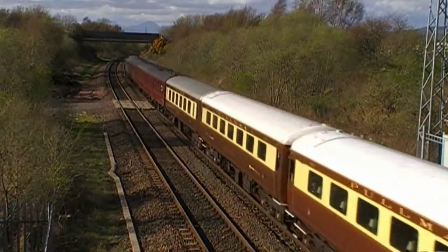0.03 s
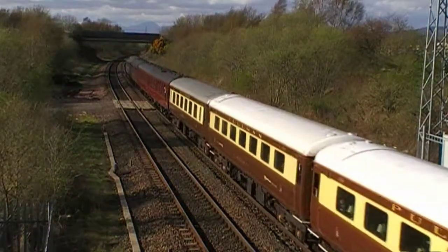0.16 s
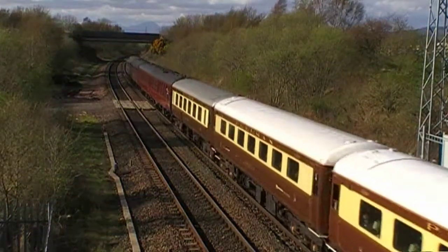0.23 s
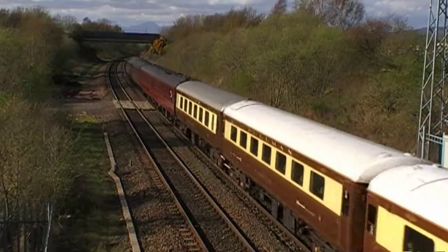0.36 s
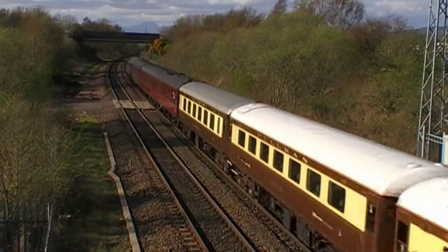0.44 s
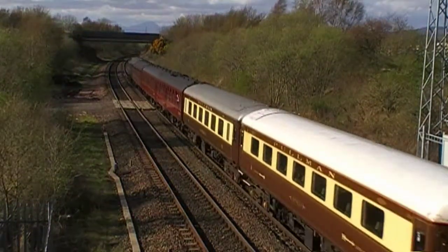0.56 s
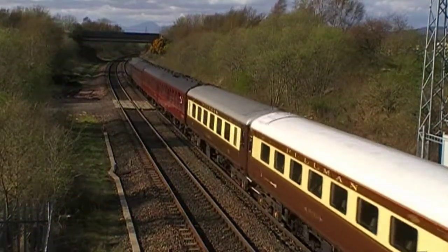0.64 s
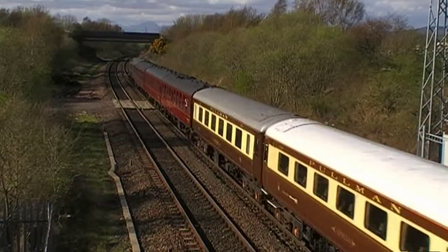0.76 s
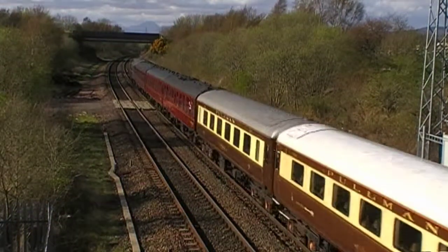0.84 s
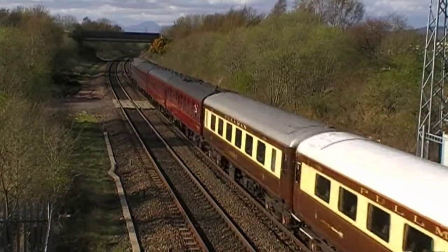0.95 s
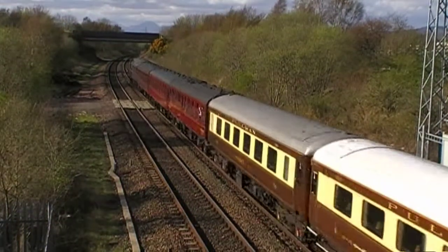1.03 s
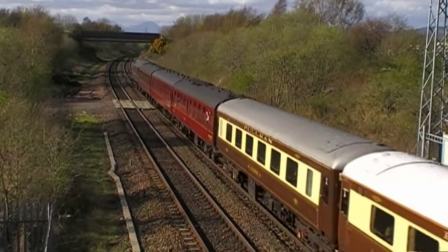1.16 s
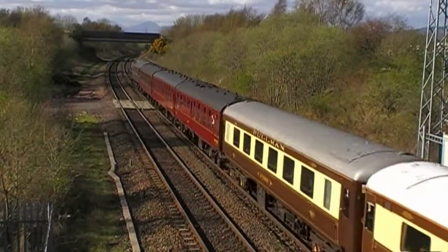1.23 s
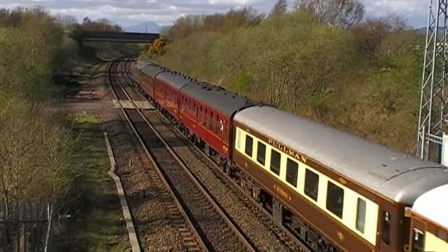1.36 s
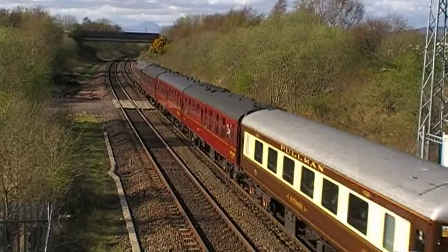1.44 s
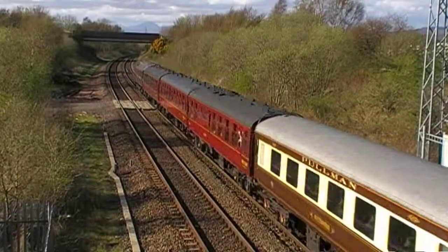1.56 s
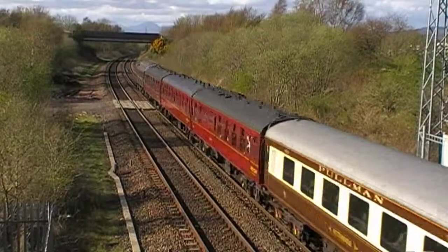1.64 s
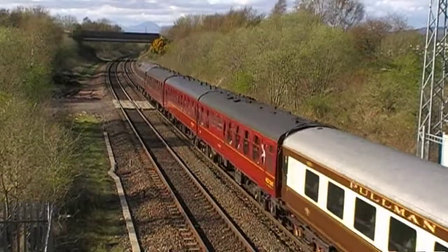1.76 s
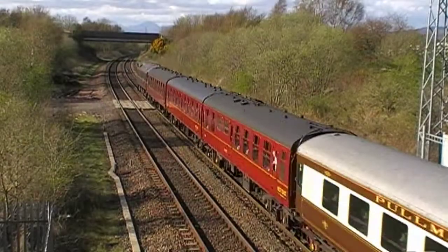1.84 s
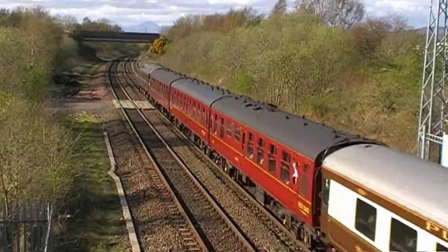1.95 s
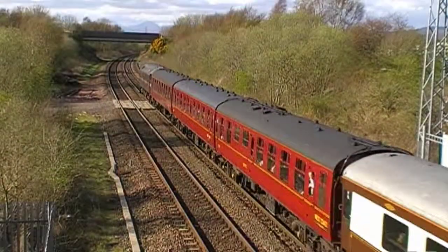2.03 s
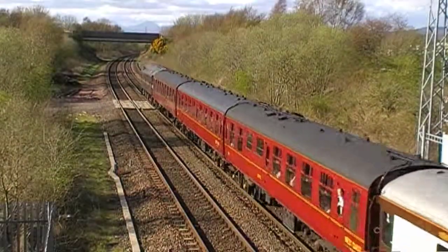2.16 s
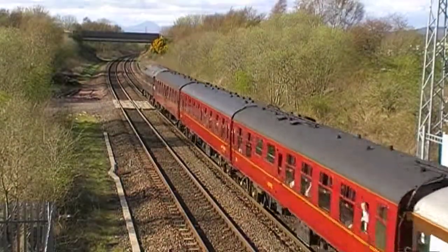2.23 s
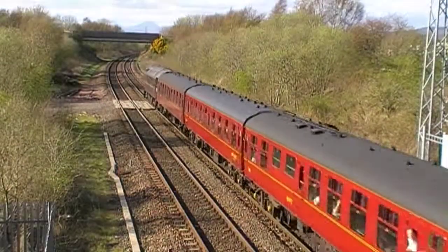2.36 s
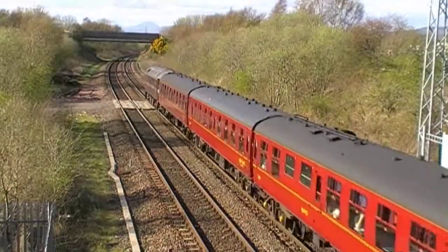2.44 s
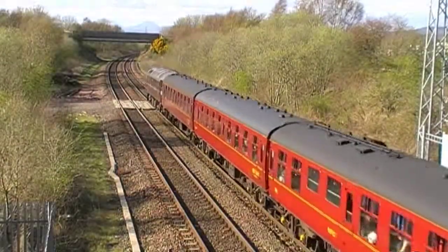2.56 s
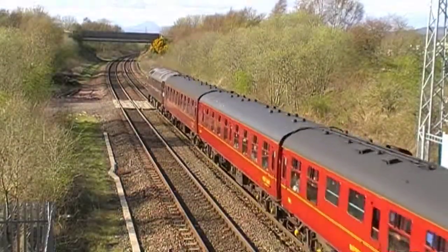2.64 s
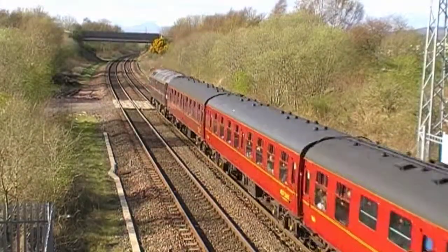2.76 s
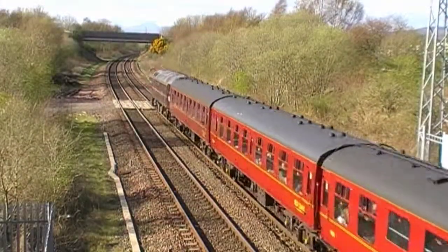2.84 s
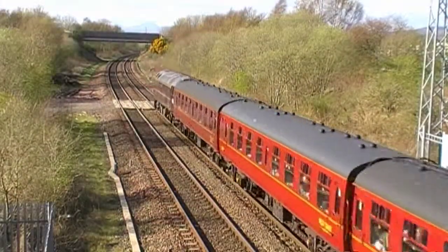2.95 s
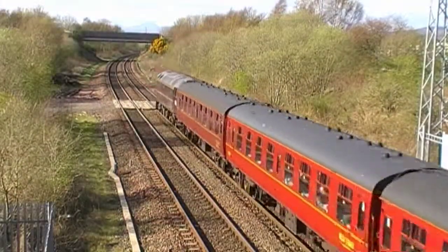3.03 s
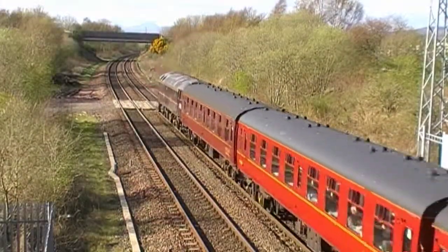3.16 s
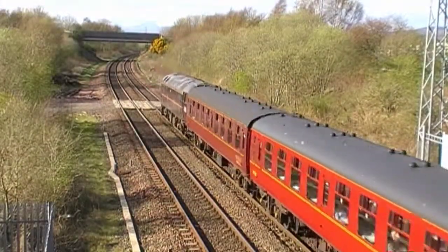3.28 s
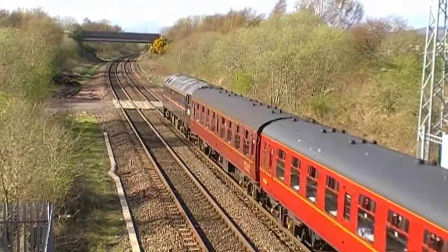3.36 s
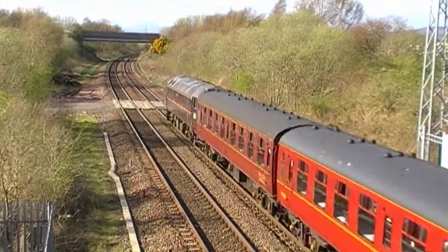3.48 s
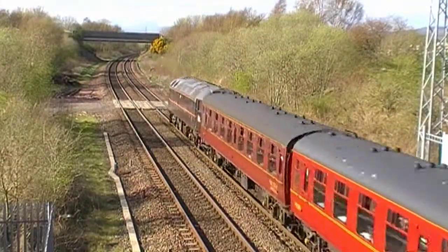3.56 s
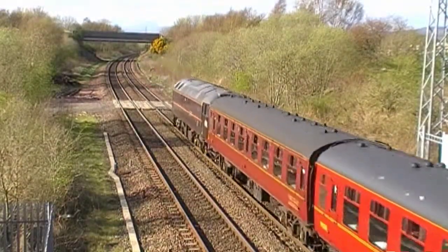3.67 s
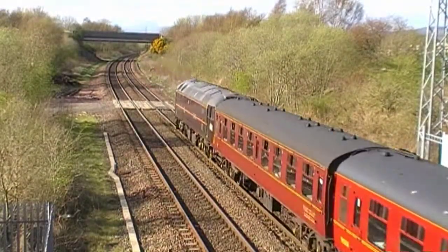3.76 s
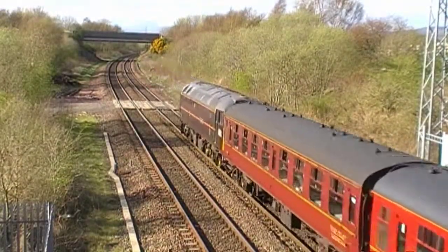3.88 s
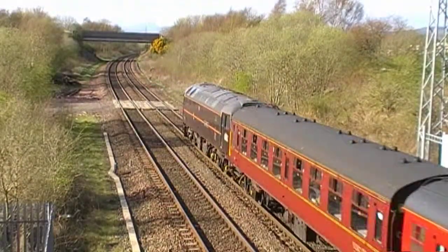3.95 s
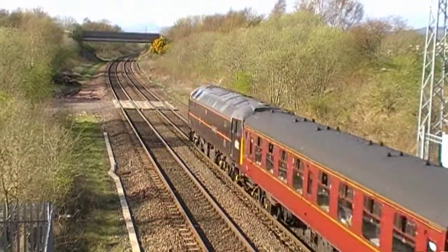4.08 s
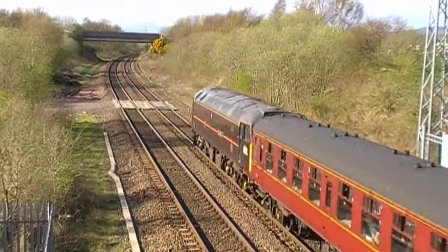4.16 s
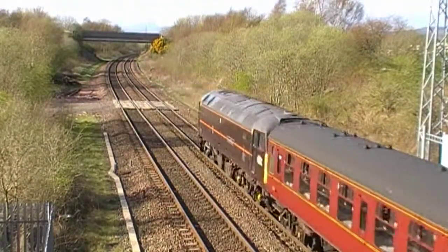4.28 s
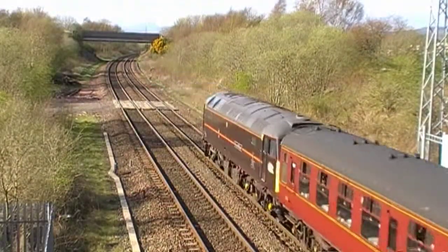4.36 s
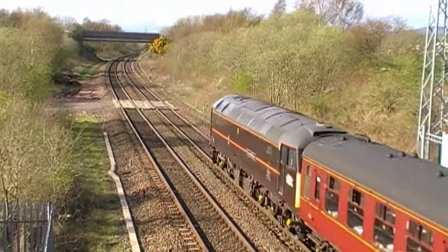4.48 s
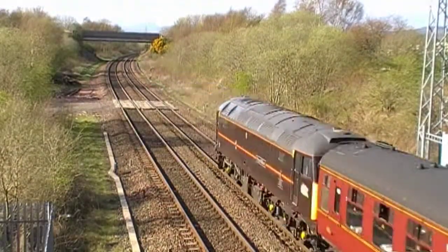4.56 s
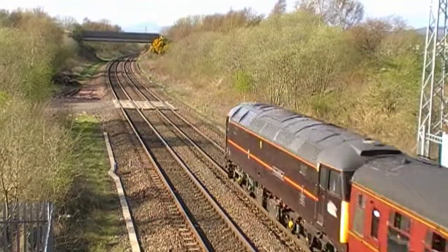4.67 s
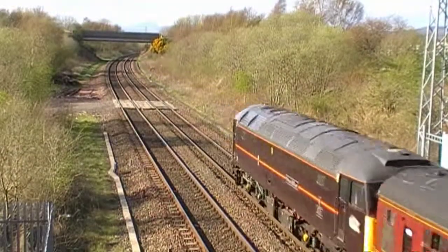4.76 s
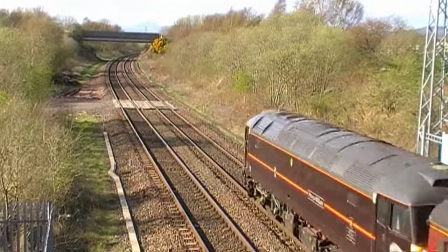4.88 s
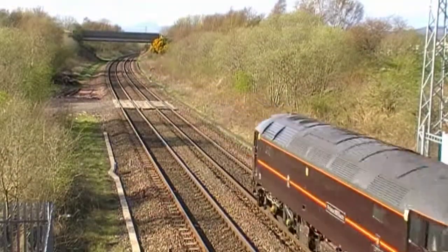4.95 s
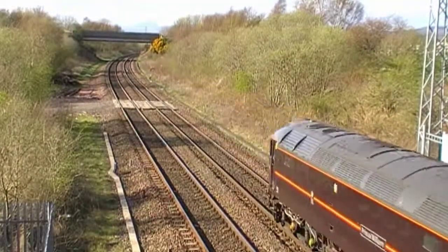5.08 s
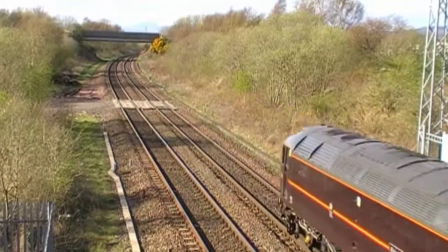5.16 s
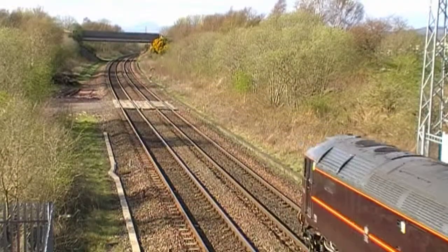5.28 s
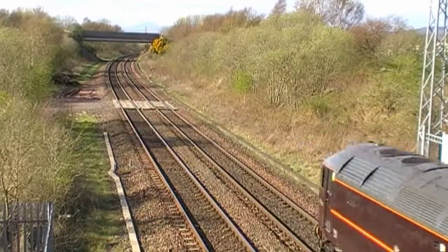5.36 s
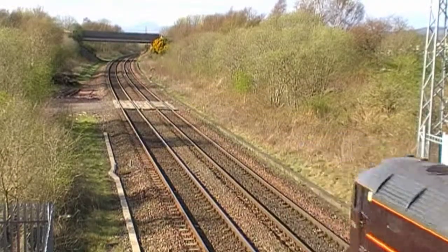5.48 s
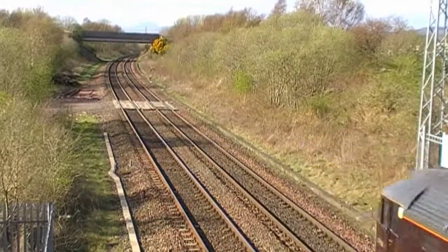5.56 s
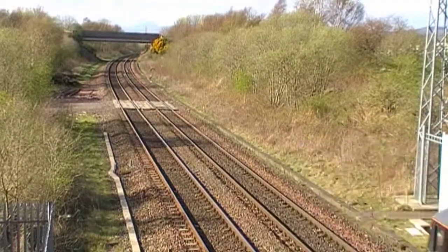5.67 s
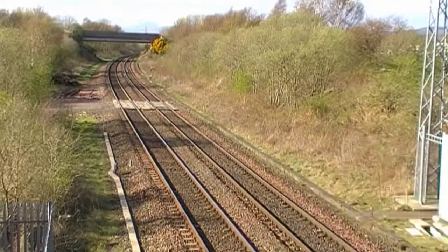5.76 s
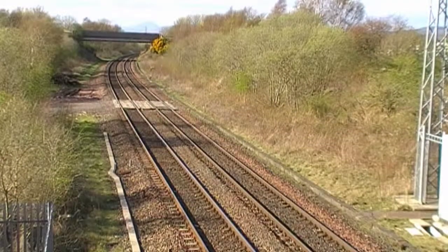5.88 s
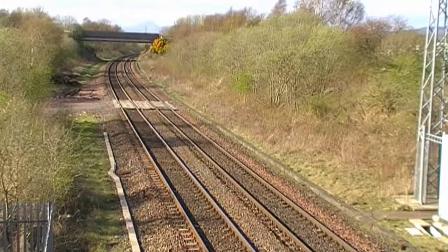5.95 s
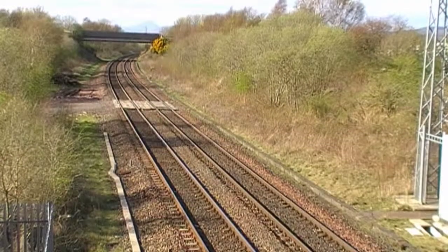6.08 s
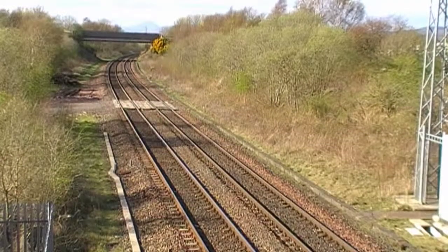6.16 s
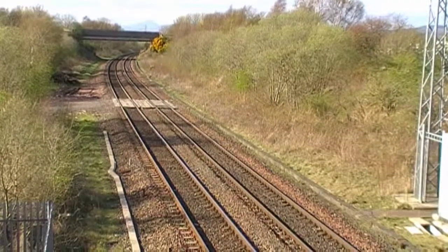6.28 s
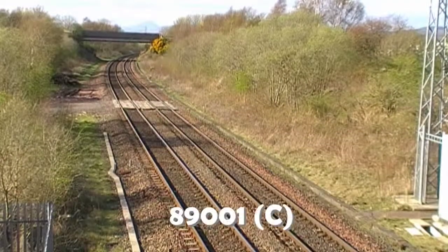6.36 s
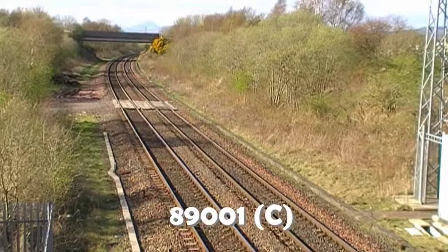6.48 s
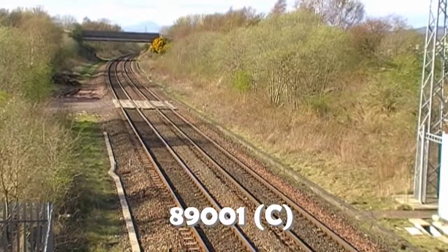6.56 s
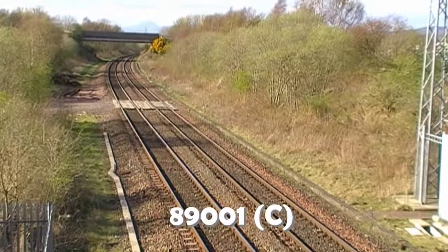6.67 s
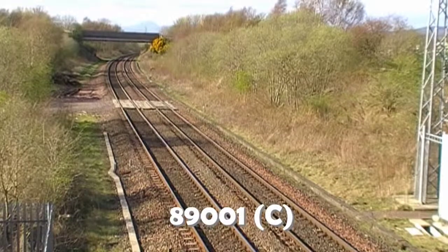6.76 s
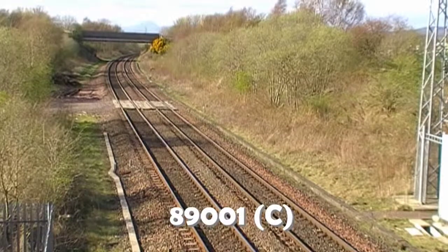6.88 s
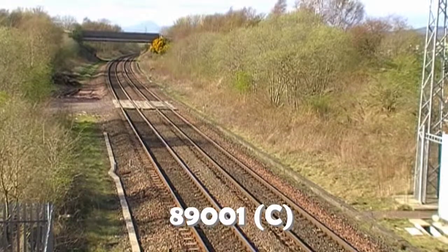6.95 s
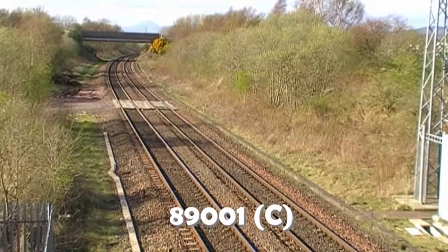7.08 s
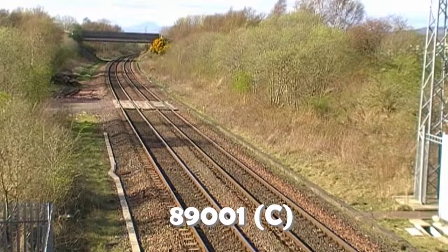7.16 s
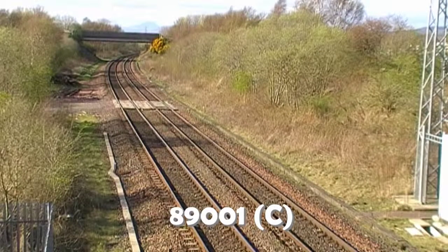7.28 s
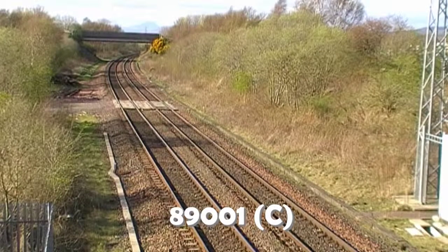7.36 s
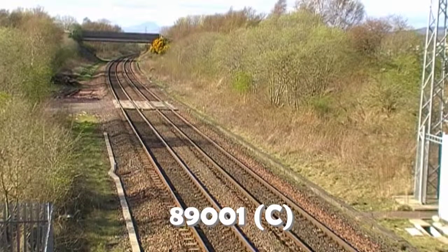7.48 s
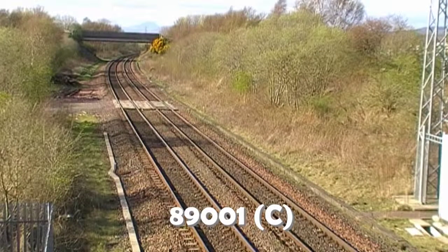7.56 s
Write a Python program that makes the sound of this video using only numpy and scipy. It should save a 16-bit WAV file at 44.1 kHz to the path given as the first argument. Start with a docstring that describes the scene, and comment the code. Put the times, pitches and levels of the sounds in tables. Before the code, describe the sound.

Outdoor stereo microphone near a railway line, already in the middle of a train pass. From 0 to 2.3 s coaches roar by, each bogie swelling and fading, with steel hiss, quick double clacks, small rattles and a blurred singing wheel tone around 1.5 to 2 s. Very short high chirps appear near 0.7 s. Wind thumps break in at 0.3 and 1.1 s. From 2.3 to 3.1 s heavy dull thuds with falling swoops boom, strongest near 2.9 s. Rolling and clatter continue, with wind bumps around 4.2 and 4.8 to 5.2 s. A hard clack lands at 5.2 s, then the rear diesel's rough low growl runs from about 5.4 to 6.3 s. After 6 s the train drops away to a distant rumble, while dense, violent wind gusts buffet the microphone until 7.6 s, the loudest distorting and briefly ducking everything.

```python
"""Passenger train running away under a footbridge

Two kinds of coach pass bogie by bogie, then a diesel locomotive at the rear, fading down the cutting.
Shaped noise makes the roar, rumble and hiss; rough tones make the singing wheels and the growl.
Short bursts make clatter, chirps and thuds. Wind eddies push the two microphone channels apart,
and the strongest make a limiter duck everything."""
import sys
import numpy as np
from scipy import signal
from scipy.fft import rfft, irfft, next_fast_len
from scipy.io import wavfile
from scipy.ndimage import uniform_filter1d, minimum_filter1d

SR = 44100
rng = np.random.default_rng(int(sys.argv[2]) if len(sys.argv) > 2 else 0)


def file_out(sig):
    """Save sig as 16-bit WAV at sys.argv[1]."""
    # one column per channel
    cols = np.atleast_2d(sig).T
    # limit, then scale
    lim = np.clip(cols, -1, 1)
    pcm = np.round(lim * 32767).astype(np.int16)
    wavfile.write(sys.argv[1], SR, pcm)


N = 335689
T = np.arange(N) / SR


def amp(db):
    """Turns decibels into a linear gain."""
    return 10 ** (np.asarray(db) / 20)


def evened(x):
    """Scales a signal to rms 1."""
    return x / np.sqrt(np.mean(x ** 2) + 1e-20)


def read(points, hz):
    """Reads a spectrum joined by straight lines on a log-frequency axis."""
    point_hz, value = np.transpose(points)
    return np.interp(np.log(hz + 1), np.log(point_hz + 1), value)


def follow(points):
    """Draws a level curve in dB through (start_s, level_db) points."""
    return np.interp(T, *np.transpose(points))


def add(mix, start_s, sound):
    """Lays a sound into the mix; a start before zero moves to zero and the end is cut off."""
    part = mix[:, max(round(start_s * SR), 0):][:, :sound.shape[-1]]
    part += sound[..., :part.shape[1]]


def tinted(x, spectrum):
    """Filters x by a spectrum in dB."""
    size = x.shape[-1]
    hz = np.fft.rfftfreq(size, 1 / SR)
    return irfft(rfft(x) * amp(read(spectrum, hz)), size)


def coloured(spectrum, size):
    """Makes two unrelated noises of rms 1 with the given spectrum."""
    return evened(tinted(rng.standard_normal((2, size)), spectrum))


def centred(size):
    """Time in s with zero in the middle."""
    return (np.arange(size) - size / 2) / SR


def grid(size):
    """Frame times (a column) and bin frequencies of a short-time spectrum."""
    hop = size // 4
    frame_s = np.arange(N // hop + 5)[:, None] * hop / SR
    return frame_s, np.fft.rfftfreq(size, 1 / SR)


def wander(t, slow_hz, fast_hz, count=20):
    """Sums sines of random phase, the slow ones strongest, into an irregular drift of rms 1."""
    rates_hz = np.geomspace(slow_hz, fast_hz, count)
    return evened(sum(np.sin(2 * np.pi * (f * t + rng.random())) / np.sqrt(f) for f in rates_hz))


def patches(shape, size, order):
    """Random blotches of rms 1, size frames long and order bins wide."""
    blurred_in_time = uniform_filter1d(rng.standard_normal(shape), size, axis=0)
    return evened(uniform_filter1d(blurred_in_time, order, axis=1))


def noise(field_db):
    """Two unrelated noises of rms 1 whose colour follows a frames x bins field in dB."""
    gain = amp(field_db)
    gain = gain / np.sqrt(np.mean(gain ** 2, axis=1, keepdims=True))  # colour only, no level changes
    real, imaginary = rng.standard_normal((2, 2) + gain.shape)
    size = 2 * (gain.shape[1] - 1)
    sound = signal.istft((real + 1j * imaginary) * gain, nperseg=size, noverlap=size - size // 4,
                         time_axis=1, freq_axis=2)[1]
    return evened(sound[:, :N])


def rough_tone(curve, waver, waver_hz, flutter_db):
    """An unbroken tone on a curve of pitch and level, unsteady in both and silent outside the curve."""
    s, hz, db = np.transpose(curve)
    # each channel wavers on its own; the flutter is common
    wavers = np.array([wander(T, waver_hz, 6 * waver_hz, count=14) for _ in range(2)])
    pitch_hz = np.interp(T, s, hz, right=hz[-1]) * (1 + waver * wavers)
    level_db = np.interp(T, s, db, left=-200, right=-200) + flutter_db * wander(T, 8, 60, count=14)
    return np.sqrt(2) * amp(level_db) * np.sin(2 * np.pi * np.cumsum(pitch_hz, axis=1) / SR)


# colour of the wind: pitch_hz, level_db
WIND_COLOUR = [(15, -22), (40, -5.5), (75, -8.5), (110, 0), (200, -4.5), (290, -9.5), (450, -16.5),
               (900, -27), (2000, -46.5), (4000, -66), (10000, -76)]
# filter on the part of the wind that both channels share: pitch_hz, level_db
SHARED_WIND = [(20, -23), (60, -13.5), (120, -16.5), (250, -12), (600, -6.5), (3000, -3)]
# steady breeze between the eddies: start_s, level_db
BREEZE_LEVEL = [(0, -18), (.9, -19), (1.9, -28.5), (2.7, -32), (3.4, -28.5), (3.7, -19.5), (4.9, -20),
                (5.35, -28), (5.9, -20.5), (6.5, -26), (7.1, -23), (7.61, -35)]
# strong eddies: centre_s, peak_db of the opposed part, length_s, shared_lift_db before the shared filter
STRONG_EDDIES = [(0.256, 0, 0.022, -2), (0.792, -9.5, 0.019, 4.5), (1.121, -3.5, 0.034, -6),
                 (1.169, 1.5, 0.013, -7), (1.487, -3.5, 0.021, 0.5), (2.046, -1.5, 0.009, -3),
                 (4.16, -3, 0.02, -2), (4.791, -7, 0.041, 2), (4.944, -6, 0.019, 3), (5.17, -5, 0.069, 7),
                 (6.075, -3.5, 0.019, -6.5), (6.326, 0, 0.03, -3), (6.425, -8.5, 0.017, 3),
                 (6.548, -1.5, 0.015, 0.5), (6.61, 0, 0.028, 2.5), (6.658, 2.5, 0.039, 0.5),
                 (6.769, 3, 0.031, 0), (6.822, -6.5, 0.019, 7), (6.914, -18, 0.017, 5),
                 (7.01, -3, 0.034, 1), (7.094, -5.5, 0.022, 2), (7.168, 0, 0.03, -1.5),
                 (7.248, -2, 0.036, 2), (7.291, -12, 0.015, 3), (7.365, -3, 0.021, 1),
                 (7.425, 1, 0.03, -0.5), (7.573, -10.5, 0.017, 3)]
# small eddies at random: middle and spread of the peak level, the middle taken over the breeze
EDDY_DB, EDDY_SPREAD_DB, EDDY_S = 12.5, 3.5, 0.034


def wind(lean_db=0.5, lumpy_db=1.0, size=8192, count=24):
    """Eddies press on the closely spaced ports, pushing the two channels in opposite directions."""
    breeze_db = follow(BREEZE_LEVEL)
    parts = coloured(WIND_COLOUR, next_fast_len(N))
    parts[:, :N] *= amp(breeze_db + lumpy_db * wander(T, 4, 25))
    parts[:, N:] = 0
    eddies = list(STRONG_EDDIES)
    for place, force in rng.random((count, 2)):
        peak_db = breeze_db[int(place * N)] + EDDY_DB + EDDY_SPREAD_DB * (2 * force - 1)
        eddies.append((place * T[-1], peak_db, EDDY_S, 0))
    t = centred(size)
    for s, peak_db, length_s, shared_lift_db in eddies:
        eddy = coloured(WIND_COLOUR, size) * np.exp(-(t / length_s) ** 2)
        eddy = eddy / abs(eddy).max(axis=1, keepdims=True)
        add(parts, s + t[0], amp([[peak_db], [peak_db + shared_lift_db]]) * eddy)
    opposed = parts[0, :N]
    common = tinted(parts[1], SHARED_WIND)[:N]
    return np.array([(common + opposed) * amp(lean_db), (common - opposed) / amp(lean_db)])


# hardest eddies slamming into the ports: centre_s, level_db of the swing in the left channel
HARD_SLAMS = [(1.147, 1), (2.033, 2), (4.798, 1), (4.941, 2.5), (5.163, 5), (6.08, 1.5), (6.323, 1),
              (6.608, 9), (7.038, 2.5), (7.163, 3.5), (7.174, 4.5), (7.351, 1), (7.377, 6.5)]
SLAM_HZ, SLAM_S = 196, 0.0024


def slams(uneven=0.71, size=2048):
    """A brief pressure swing throws the channels in opposite directions, the right one less far."""
    out, t = np.zeros((2, N)), centred(size)
    for s, level_db in HARD_SLAMS:
        swell = np.exp(-(t / SLAM_S) ** 2)
        swing = amp(level_db) * swell * np.cos(2 * np.pi * (SLAM_HZ * t + rng.random()))
        add(out, s + t[0], np.array([swing, -uneven * swing]))
    return out


# bogies going by below the microphone: nearest_s, roar_db, hiss_db
BOGIE_PASSES = [(0.15, -22, -46), (0.46, -20.5, -36), (0.74, -23.5, -35.5), (1.0, -20.5, -38),
                (1.42, -21.5, -32.5), (1.74, -16, -33.5), (2.28, -25, -31.5), (2.54, -15.5, -31),
                (3.12, -21.5, -33), (3.4, -16.5, -35), (4.14, -21.5, -35), (4.38, -16, -38),
                (4.76, -21, -36), (5.2, -15.5, -30), (5.6, -19, -29.5), (5.94, -24, -32.5)]
# how long a bogie stays within 6 dB on either side of its loudest; the roar trails the hiss
ROAR_REACH_S, HISS_REACH_S, ROAR_LAG_S = 0.37, 0.24, 0.065
# steady floor from the rest of the train, far down the cutting
FAR_ROAR_DB, FAR_HISS_DB = -29.5, -52.5


def passing(t, axis, reach, far_db):
    """Level in dB of all bogies together: each swells as it nears and fades as it leaves."""
    rows = np.array(BOGIE_PASSES)
    nearness = 1 / (1 + ((np.asarray(t)[..., None] - rows[:, 0]) / reach) ** 2)
    power = ((amp(rows[:, axis]) * nearness) ** 2).sum(-1)
    return 10 * np.log10(power + amp(far_db) ** 2)


def contact(t):
    """Level in dB of the wheel contact hiss, which also tells how near the wheels are."""
    return passing(t, axis=2, reach=HISS_REACH_S, far_db=FAR_HISS_DB)


# resonances of each vehicle: start_s, end_s, fade_s, pitch_hz, width_hz, lift_db
VEHICLE_RESONANCES = [(-3, 1.4, 1, 966, 110, 6.5), (0, 1.9, 0.52, 1880, 105, 5.5),
                      (1, 2.8, 0.35, 1787, 120, 5.5), (0, 1.7, 0.82, 1240, 200, 5.5),
                      (3, 3.8, 0.35, 2050, 330, 3.5), (2.5, 4.6, 0.4, 1313, 87, 6.5),
                      (4, 5.1, 0.68, 1450, 74, 4.5), (4, 6.05, 0.21, 940, 35, 4.5),
                      (2, 4.95, 0.42, 980, 69, 4), (-4.5, 2.6, 1, 445, 34, 2.5),
                      (-1.5, 3.05, 0.7, 262, 74, 1.5), (2.5, 3.1, 0.74, 156, 53, 8.5),
                      (3, 4.8, 0.55, 100, 68, 5), (4.5, 6.84, 0.45, 324, 110, 5.5),
                      (4, 4.3, 0.3, 460, 32, 1), (4.5, 5.9, 0.2, 470, 34, 7),
                      (5.5, 5.45, 0.72, 2100, 220, 5.5), (6, 7.61, 1, 720, 300, 4.5),
                      (5.5, 8.4, 0.68, 2050, 690, 4)]


def ringing(t, hz, drift=0.0064, flicker=0.42):
    """The resonances of each vehicle swell in and fade as it goes by; each drifts and flickers alone."""
    lift_db = 0
    for start_s, end_s, fade_s, pitch_hz, width_hz, peak_db in VEHICLE_RESONANCES:
        presence = np.clip(1 + np.minimum(t - start_s, end_s - t) / fade_s, 0, 1)
        flickering = 1 + flicker * wander(t, 2, 14)
        centre_hz = pitch_hz * (1 + drift * wander(t, 2.4, 12))
        bell = 1 / (1 + (2 * (hz - centre_hz) / width_hz) ** 2)
        lift_db = lift_db + peak_db * presence * flickering * bell
    return lift_db


# colour of the low boom: pitch_hz, level_db
RUMBLE_COLOUR = [(20, -43), (60, -7.5), (110, -3), (170, 0), (280, 3), (345, -2), (450, 2.5), (560, -4),
                 (800, -5.5), (2000, -60)]
# deep noise of the coach bodies and at last the locomotive: start_s, level_db
BODY_LEVEL = [(0, -24), (1.5, -24.5), (2.45, -19.5), (2.87, -22.5), (3.1, -18), (3.6, -21), (4, -23.5),
              (5, -25), (5.25, -18.5), (5.55, -17.5), (6.05, -18), (6.25, -20.5), (6.4, -23), (6.55, -23.5),
              (7.1, -27), (7.61, -29)]


def rumble(throb_db=1.16):
    """Bogies and hollow bodies boom: low noise, lifted by the vehicle resonances, that throbs in level."""
    t, hz = grid(size=2048)
    field_db = read(RUMBLE_COLOUR, hz) + ringing(t, hz)
    return noise(field_db) * amp(follow(BODY_LEVEL) + throb_db * wander(T, 4.6, 30))


# growl of the locomotive: start_s, pitch_hz, level_db
GROWL_CURVE = [(5.2, 278, -46), (5.55, 270, -26.5), (5.75, 265, -23.5), (5.88, 276.6, -24),
               (6.07, 276, -25.5), (6.25, 285, -17.5), (6.4, 288.7, -39.5), (6.5, 292, -31),
               (6.8, 285, -41), (7.2, 290, -44)]


def drone():
    """The locomotive holds a rough growl as it draws away."""
    return rough_tone(GROWL_CURVE, waver=0.069, waver_hz=12, flutter_db=2)


# heavy jolts: fullest_s, thud_db, length_s, swoop_db
BOGIE_THUDS = [(1.376, -18.5, 0.028, -22), (2.31, -21, 0.016, -28), (2.531, -16, 0.023, -23),
               (2.607, -17, 0.034, -14), (2.645, -15, 0.039, -17), (2.739, -14.5, 0.043, -13.5),
               (2.868, -9, 0.027, -15), (2.995, -18, 0.022, -15), (3.135, -14, 0.025, -24)]
# colour of a thud: pitch_hz, level_db
THUD_COLOUR = [(50, -32), (115, -10), (165, 10), (245, -0.5), (340, -13), (475, 0), (570, -7), (720, -21),
               (1500, -16), (5000, -70)]
# the swoop: pitch that arrives first, and how far it runs ahead of the thud
SWOOP_HZ, SWOOP_S = 996, .05


def swoop(length, waver=0.14, fall_s=.02, boom_hz=155, size=8192):
    """Bending waves in the rail travel faster the higher they are, so a rough tone falls into a boom."""
    t = np.arange(size) / SR
    fall_hz = boom_hz + (SWOOP_HZ - boom_hz) * np.exp(-t / fall_s)
    pitch_hz = fall_hz * (1 + waver * wander(t, 59.7, 513))
    rise = np.minimum(t / SWOOP_S, 1)
    decay = np.exp(-(np.maximum(t - SWOOP_S, 0) / length) ** 2)
    turns = np.cumsum(pitch_hz) / SR + rng.random((2, 1))
    return np.sqrt(2) * rise * decay * np.sin(2 * np.pi * turns)


def thuds(size=8192):
    """Heavy jolts swoop down the rail, then swell and die in the bogie frame."""
    out, t = np.zeros((2, N)), centred(size)
    for s, thud_db, length_s, swoop_db in BOGIE_THUDS:
        swell = np.exp(-2 * (t / length_s) ** 2)
        thud = evened(coloured(THUD_COLOUR, size) * swell) * np.sqrt(np.mean(swell ** 2))
        add(out, s + t[0], amp(thud_db) * thud)
        add(out, s - SWOOP_S, amp(swoop_db) * swoop(length_s))
    return out


# colour of a blow on the rail: pitch_hz, level_db
CLACK_COLOUR = [(300, -11), (900, 3), (2000, 7.5), (4000, 6.5), (7300, 2), (8300, -3.5), (9000, -5),
                (9600, -8), (10150, -3), (11300, -21), (12500, -19), (13800, -44)]
# high modes of a struck wheel, each blow detuning them: pitch_hz, level_db against the blow, t60_s
WHEEL_MODES = [(9150, -18.5, 0.077), (10150, -21.5, 0.045), (12500, -33, 0.062)]


def clack(t60, build=0.0034, size=8192):
    """A blow on the rail: dense steel modes build up within milliseconds and die; the wheel rings on."""
    t = np.arange(size) / SR
    ring = 0
    for pitch_hz, level_db, ring_t60 in WHEEL_MODES:
        turns = pitch_hz * rng.uniform(0.92, 1.01) * t + rng.random((2, 1))
        ring = ring + amp(level_db - 60 * t / ring_t60) * np.sin(2 * np.pi * turns)
    burst = coloured(CLACK_COLOUR, size) * amp(-60 * t / max(t60, .01))
    return (burst + ring) * (1 - np.exp(-(t / build) ** 2))


# flanges chirping against the rail: start_s, pitch_hz, level_db, length_s
FLANGE_CHIRPS = [(0.688, 9020, -37, .03), (.77, 10000, -43, .025), (0.793, 9800, -41, .025),
                 (2.62, 11450, -53, .05), (3.842, 8900, -40, .02), (4.85, 9400, -45, .02)]


def chirps():
    """Wheel flanges stick and slip on the rail in short, rough, very high tones."""
    out = np.zeros((2, N))
    for s, pitch_hz, level_db, length_s in FLANGE_CHIRPS:
        t = np.arange(int(length_s * SR)) / SR
        slips = 1 + .012 * wander(t, 100, 600)  # stick and slip roughen the pitch
        turns = np.cumsum(pitch_hz * slips) / SR + rng.random((2, 1))
        add(out, s, amp(level_db) * np.hanning(len(t)) * np.sin(2 * np.pi * turns))
    return out


# wheels striking the rail: strike_s, level_db
WHEEL_BLOWS = [(0.394, -21), (0.485, -30), (0.508, -22), (0.667, -22.5), (1.394, -20.5), (1.445, -24.5),
               (1.545, -28), (1.68, -24.5), (2.157, -22), (2.2, -31), (2.273, -20), (2.429, -21),
               (2.539, -22), (2.622, -24), (3.008, -26), (3.029, -25), (3.288, -25), (3.877, -24),
               (3.901, -20.5), (4.014, -27), (4.138, -21), (4.158, -23), (4.269, -23), (4.765, -23.5),
               (4.789, -32), (4.88, -23), (5.223, -12), (5.629, -21), (5.681, -21), (5.706, -27)]
CLACK_T60_S = 0.07
# looser parts knock just after each blow: delay, and level against the blow
KNOCK_S, KNOCK_DB = .024, -3


def clatter(rattle_db=1, spread_db=3, early=.004, count=120):
    """Loud wheel blows with their knocks, and small running-gear rattles that grow as bogies near."""
    out = np.zeros((2, N))
    for s, level_db in WHEEL_BLOWS:
        for delay_s, change_db in (0, 0), (KNOCK_S, KNOCK_DB):
            add(out, s - early + delay_s, amp(level_db + change_db) * clack(CLACK_T60_S))
    for place, force in rng.random((count, 2)):
        s = place * BOGIE_PASSES[-1][0]
        level_db = contact(s) + rattle_db + spread_db * (2 * force + 1.0)
        add(out, s, amp(level_db) * clack(t60=0.043))
    return out


# colour of the contact hiss: pitch_hz, level_db
HISS_COLOUR = [(600, -19), (1800, 9.5), (3000, 3.5), (4500, 0), (6000, -1.5), (7200, -2.5), (8300, -10),
               (10000, -15), (11000, -21), (12500, -34), (13500, -44)]


def hiss(flutter_db=-0.2, patchy_db=1.4, near_db=-35, brightening=0.057):
    """Steel scrubs on steel; near wheels sound brighter and more ragged than far ones."""
    t, hz = grid(size=256)
    nearness_db = np.clip(contact(t) - near_db, -6, 6)
    octaves_up = np.log2(np.maximum(hz, 3000) / 3000)
    field_db = read(HISS_COLOUR, hz) + brightening * nearness_db * octaves_up
    field_db = field_db + patchy_db * patches(field_db.shape, size=8, order=6)
    level_db = contact(T)
    ragged = np.minimum(amp((level_db - near_db) / 2), 1)
    return noise(field_db) * amp(level_db + flutter_db * ragged * wander(T, 6.2, 110))


# singing wheels of the first coaches: start_s, pitch_hz, level_db
SINGING_CURVE = [(0, 1908, -34), (.45, 1880, -38), (.75, 1865, -37), (1.1, 1883, -35), (1.45, 1870, -30.5),
                 (1.85, 1850, -28.5), (2.2, 1810, -36), (2.65, 1835, -41), (3, 1824, -43)]


def singing():
    """One wheel mode is kept ringing by the rail, roughly enough to blur into the roar."""
    return rough_tone(SINGING_CURVE, waver=0.027, waver_hz=25.97, flutter_db=3.0)


# wheels on rough patches of rail: centre_s, lift_db (a negative one dips), length_s
ROUGH_PATCHES = [(0.18, 1.5, 0.077), (0.458, 2, 0.03), (0.615, 3, 0.044), (0.736, 1.5, 0.032),
                 (1.038, 4.5, 0.06), (1.385, 4, 0.015), (1.637, 3.5, 0.018), (1.718, 3, 0.025),
                 (1.843, 2.5, 0.02), (1.945, 2.5, 0.038), (2.323, 2, 0.039), (2.554, 3.5, 0.011),
                 (2.727, 2, 0.027), (2.86, 2, 0.019), (3.29, 1.5, 0.016), (3.384, 0.5, 0.006),
                 (3.41, 3, 0.02), (3.566, -0.5, 0.027), (3.685, 2, 0.016), (4.276, -0.5, 0.035),
                 (4.457, 1, 0.075), (4.63, 0.5, 0.047), (4.76, 3.5, 0.016), (5.048, 1, 0.008),
                 (5.355, 2.5, 0.027), (5.454, 0.5, .04), (6.047, 3.5, 0.06), (6.255, 3.5, .035)]


def surging():
    """Change in dB of the roar as wheels cross rough patches of rail."""
    return sum(db * np.exp(-((T - s) / length_s) ** 2) for s, db, length_s in ROUGH_PATCHES)


# colour of the rolling roar: pitch_hz, level_db
ROAR_COLOUR = [(200, -37), (400, -8), (560, -2), (800, 0.5), (1020, -3.5), (1200, -8), (1600, -12),
               (2200, -17.5), (3000, -21.5), (4500, -28), (8000, -39.5), (13000, -64)]


def rolling(flutter_db=0.5, patchy_db=0.9, near_db=-35, dulling=0.1):
    """Rough treads shake wheels and rails; the roar surges, flutters and dulls with distance."""
    t, hz = grid(size=1024)
    octaves_up = np.log2(np.maximum(hz, 1000) / 1000)
    field_db = read(ROAR_COLOUR, hz) + ringing(t, hz) + dulling * (contact(t) - near_db) * octaves_up
    field_db = field_db + patchy_db * patches(field_db.shape, size=9, order=3)
    level_db = passing(T - ROAR_LAG_S, axis=1, reach=ROAR_REACH_S, far_db=FAR_ROAR_DB)
    return noise(field_db) * amp(level_db + surging() + flutter_db * wander(T, 15, 60))


# likeness of the train at the two ports: pitch_hz, likeness (0 to 1)
PORT_LIKENESS = [(60, 0), (200, 0.86), (600, 0.88), (1300, 0.92), (4000, .95), (13000, .85)]
# phase by which the right port leads: pitch_hz, lead_rad
PORT_LEAD = [(60, 0.74), (260, 0.84), (600, 0.19), (1250, 0.1), (2400, 0.49), (5200, 0.27), (9200, 0.85),
             (11500, .1)]
# level of left over right: pitch_hz, balance_db
PORT_BALANCE = [(100, 5), (360, 2), (660, -0.1), (1200, -1), (2200, 0), (4000, -2.5), (7200, -.5)]


def ports(pair):
    """The train reaches both microphone ports nearly alike above the bass, the right a little sooner."""
    size = next_fast_len(N)
    hz = np.fft.rfftfreq(size, 1 / SR)
    left, other = rfft(pair, size)
    same = np.clip(read(PORT_LIKENESS, hz), 0, .96)
    lean = amp(read(PORT_BALANCE, hz) / 2)
    right = (same * left + np.sqrt(1 - same ** 2) * other) * np.exp(1j * read(PORT_LEAD, hz))
    return irfft(np.array([left * lean, right / lean]), size)[:, :N]


def scene():
    """The train is heard through both ports; the wind acts on the ports directly."""
    train = rumble() + drone() + thuds() + clatter() + chirps() + hiss() + singing() + rolling()
    return wind() + slams() + ports(train)


def record(dry, limit_db=-1.5, recovery_db=70, attack=0.0069, hold_s=0.036):
    """A limiter drops fast, holds and recovers at recovery_db per s; the rest clips; then the band limit."""
    over_db = np.maximum(20 * np.log10(abs(dry).max(axis=0) + 1e-9) - limit_db, 0)
    half = int(hold_s * SR / 2)
    held_db = -minimum_filter1d(-over_db, 2 * half + 1, origin=half)
    duck_db = np.maximum.accumulate(held_db + recovery_db * T) - recovery_db * T
    lag = np.exp(-1 / (attack * SR))
    smooth_duck_db = signal.lfilter([1 - lag], [1, -lag], duck_db)
    limited = np.clip(dry / amp(smooth_duck_db), -1, 1)
    band_limit = signal.firwin(255, 13600, window=("kaiser", 9), fs=SR)  # low-pass, edge in Hz
    return signal.oaconvolve(limited, band_limit[None], "same")


dry = scene()
out = record(dry)
file_out(out)
```